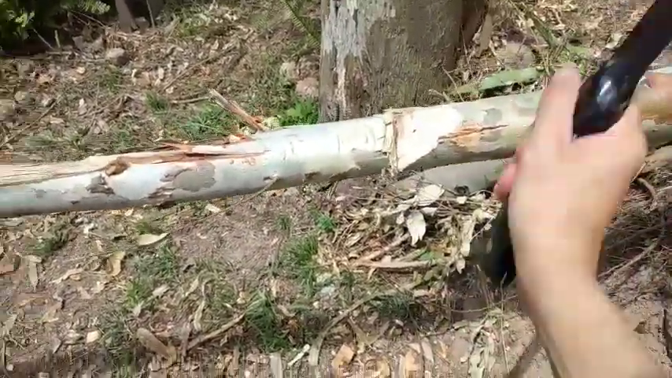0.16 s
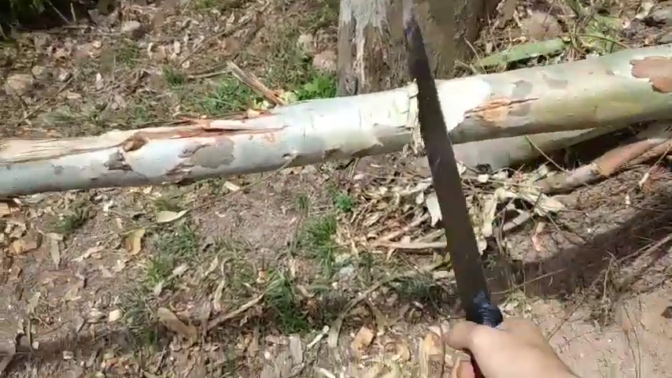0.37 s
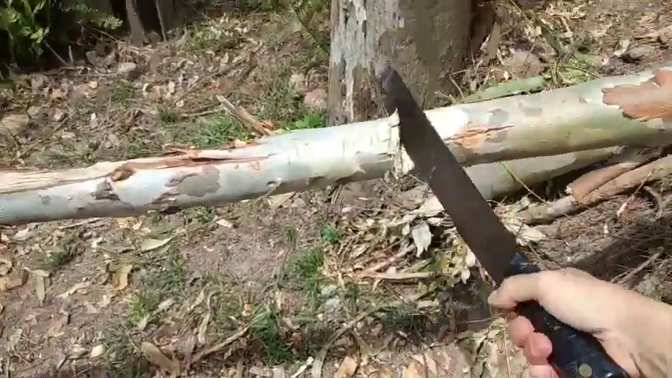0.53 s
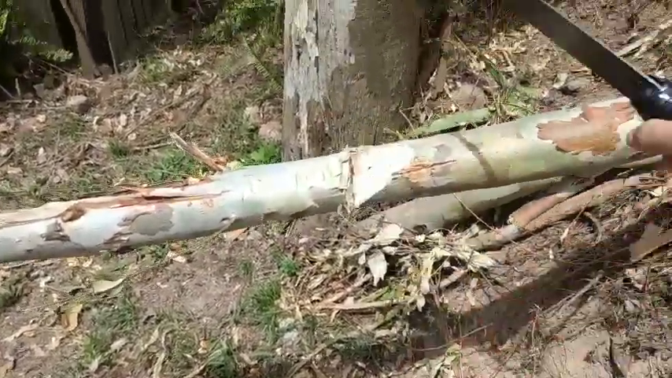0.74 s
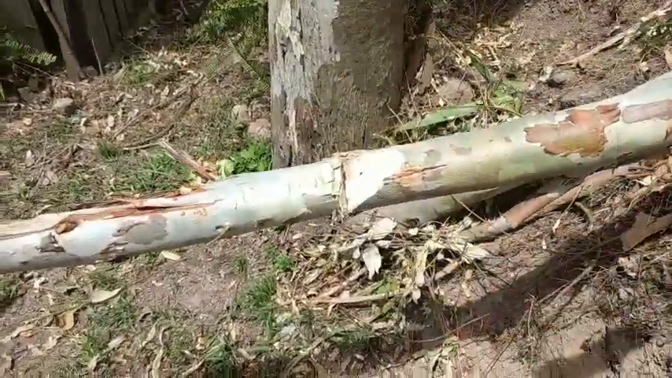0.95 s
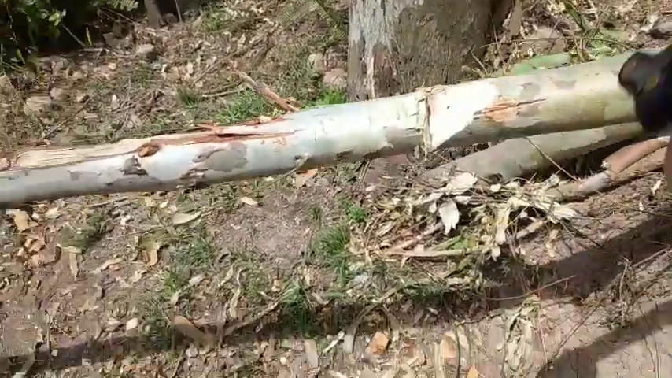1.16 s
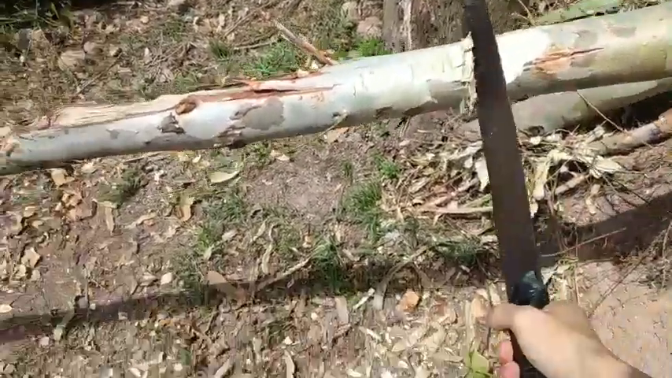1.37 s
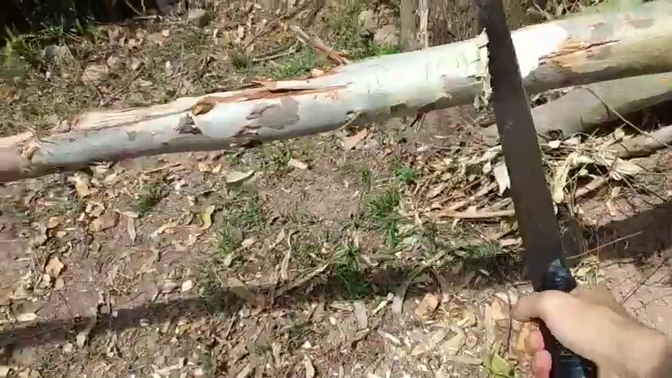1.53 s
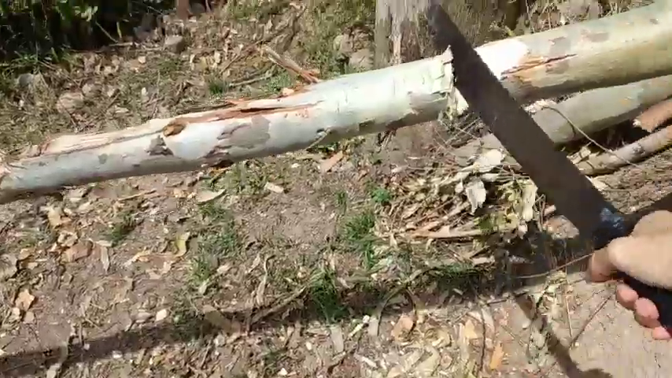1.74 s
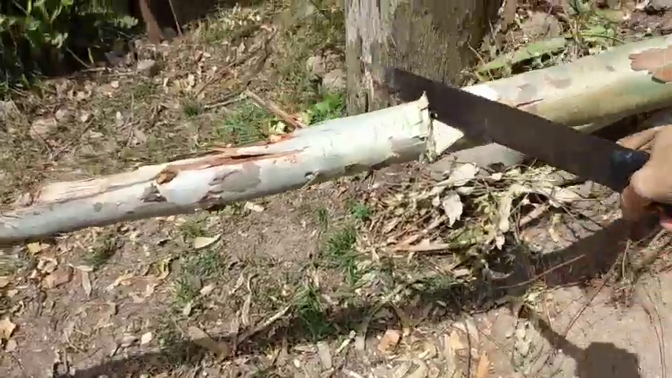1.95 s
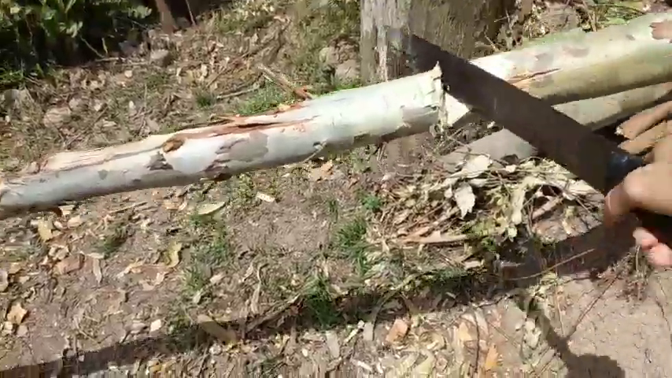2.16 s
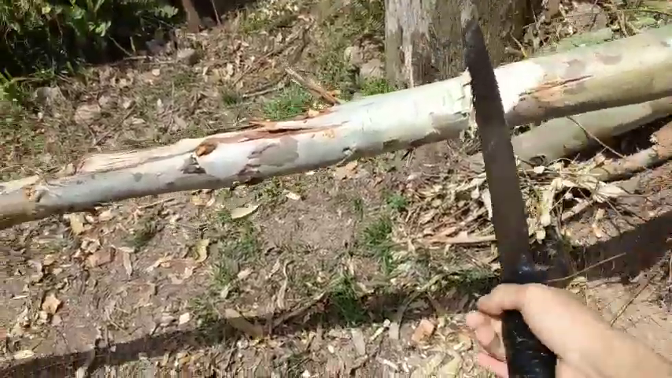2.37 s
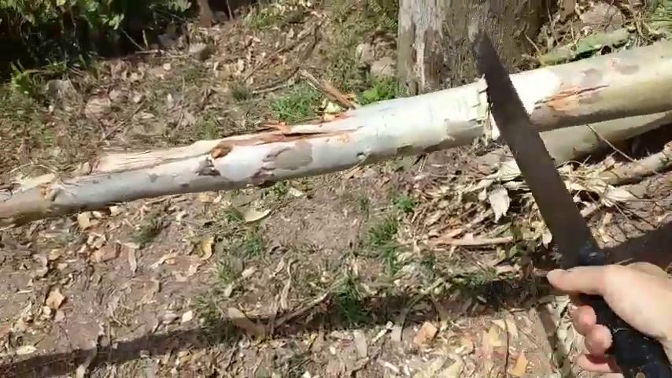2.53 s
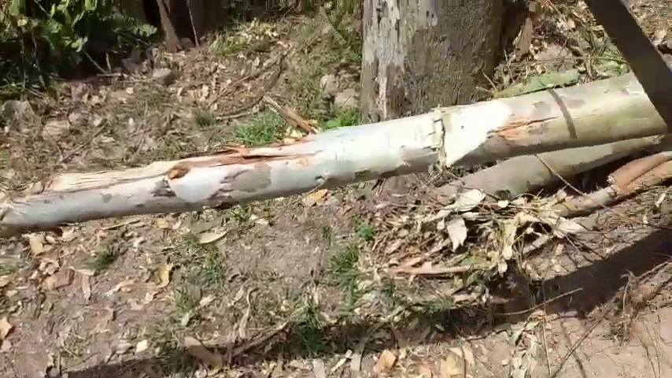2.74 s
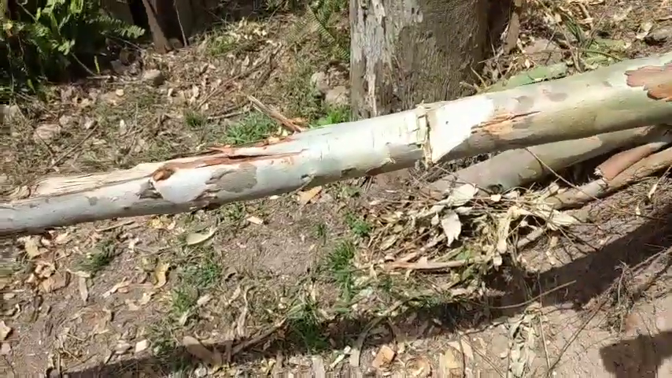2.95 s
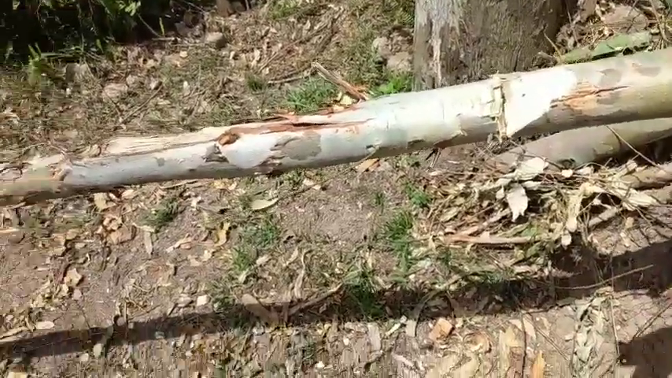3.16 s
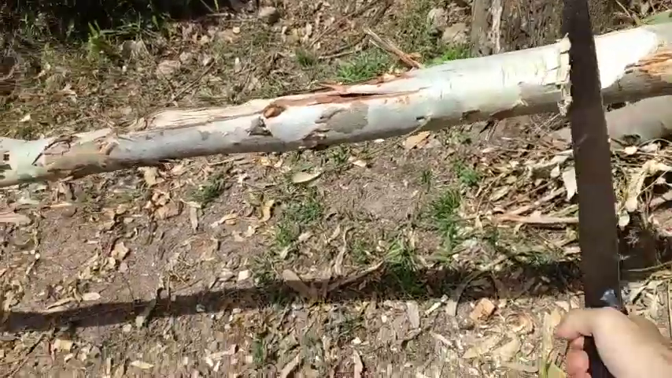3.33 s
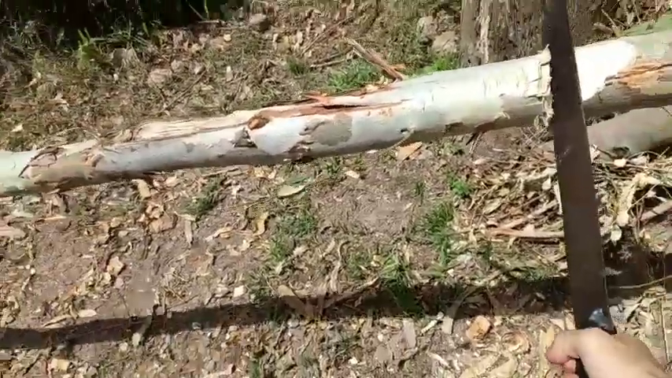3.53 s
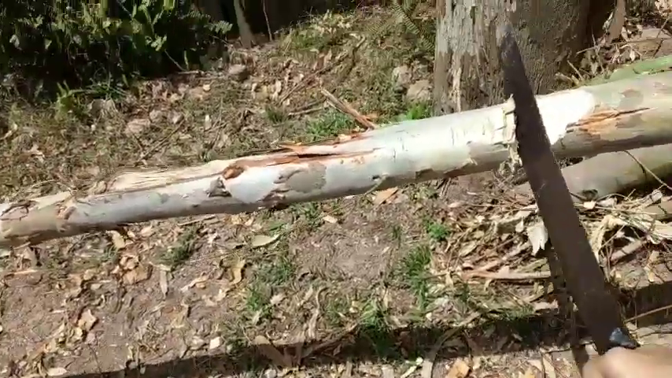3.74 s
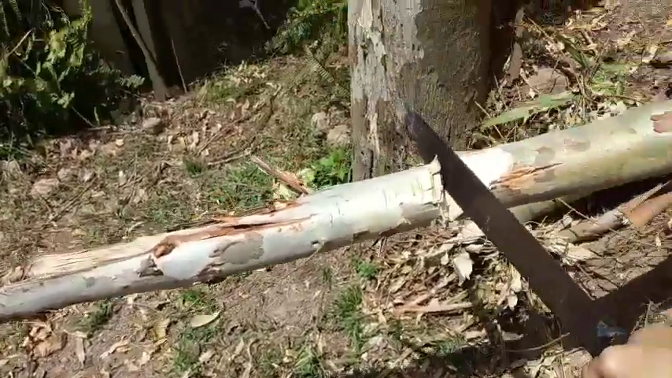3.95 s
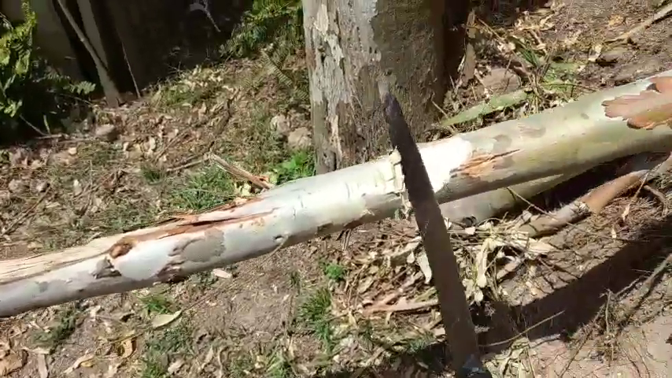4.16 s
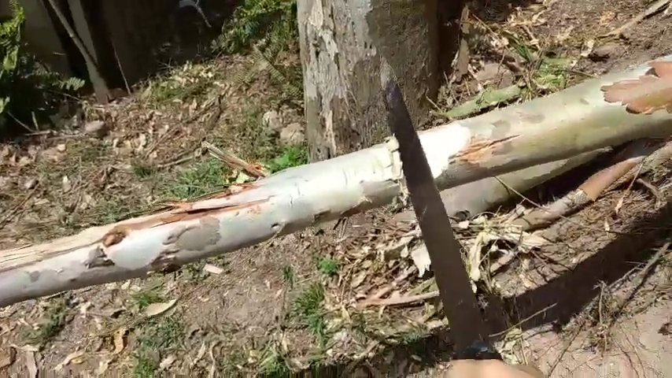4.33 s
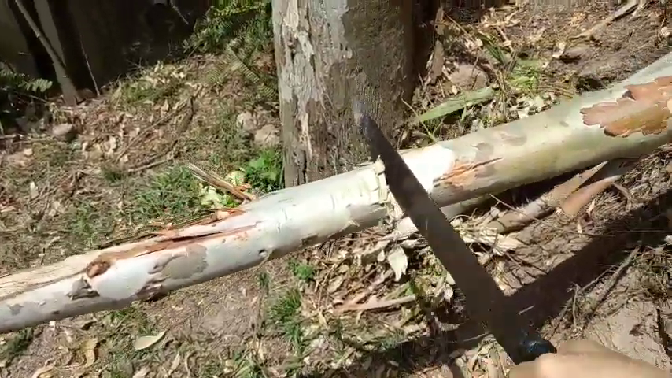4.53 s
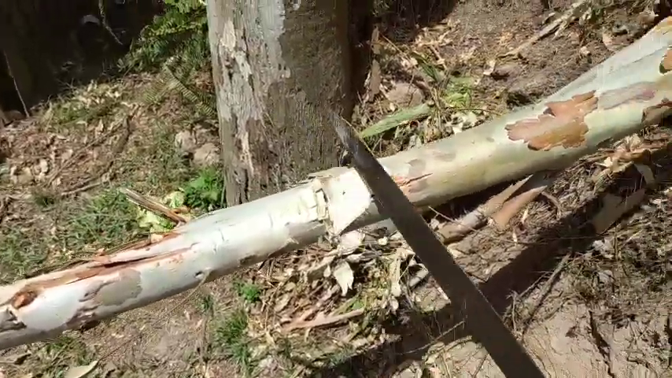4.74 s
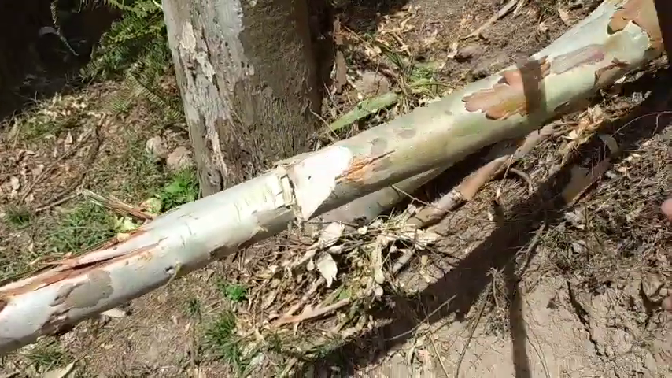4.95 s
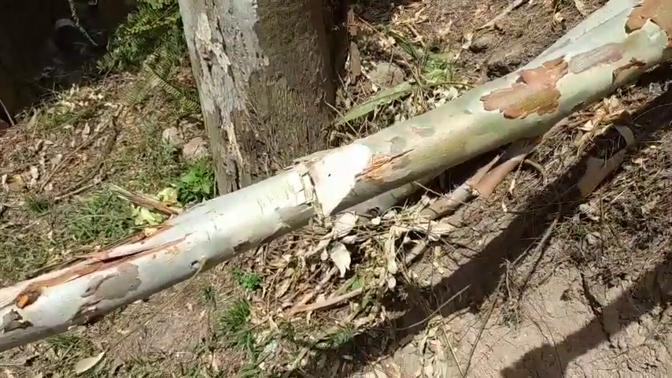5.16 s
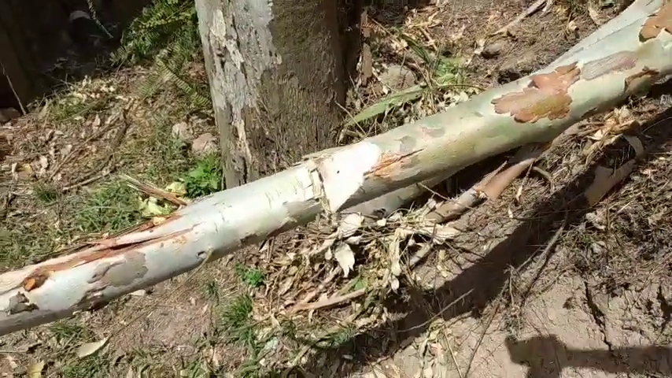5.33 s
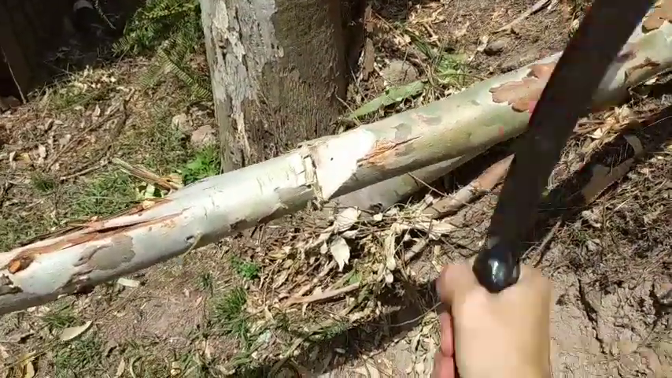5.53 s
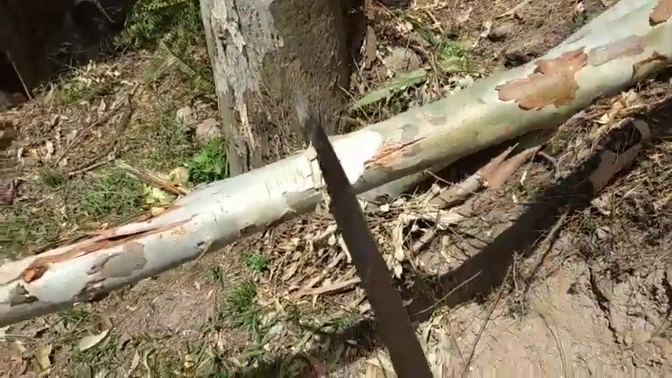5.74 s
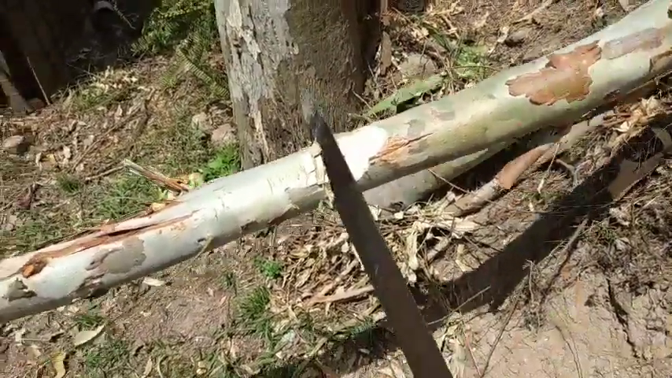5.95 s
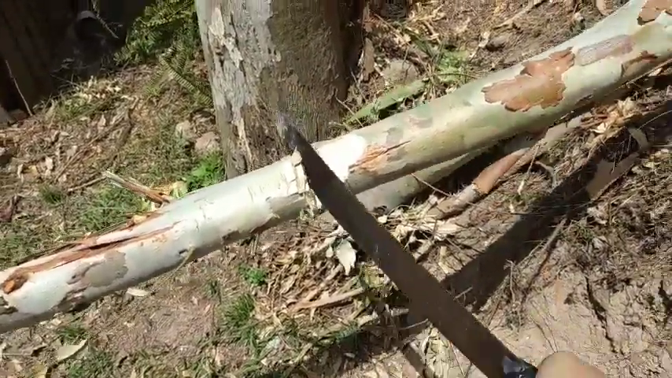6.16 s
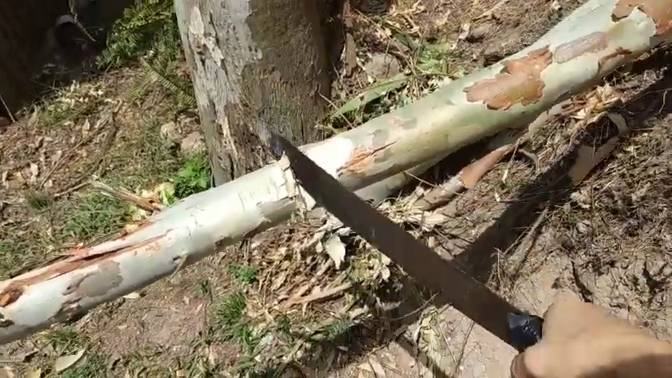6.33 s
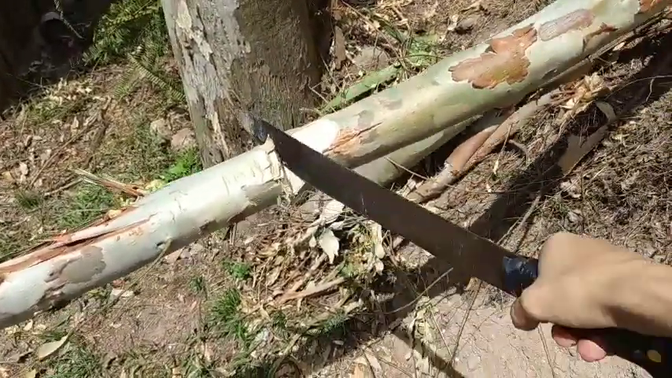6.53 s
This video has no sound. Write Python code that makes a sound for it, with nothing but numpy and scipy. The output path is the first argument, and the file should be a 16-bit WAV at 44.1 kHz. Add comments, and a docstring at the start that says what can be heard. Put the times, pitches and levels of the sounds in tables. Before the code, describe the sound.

Four sharp machete chops into a felled pole, each a woody crack with a short yard echo and falling chips, wind buffeting low between.

```python
"""A machete chops four times into a felled pole in a yard, an arm's length from the microphone.
Each bite is a burst of snapping-fibre noise and a thud, with decaying pole and blade modes, an echo
from the yard, a patter of chips and a slow surge from the overloaded microphone ports.
Between the blows the blade rubs in the cut as grainy bands of noise, wind buffets each port
as lumpy low noise, and a wavering sine hums far away over a murk of outdoor noise."""
import sys
import numpy as np
from scipy import signal
from scipy.fft import rfft, irfft, next_fast_len
from scipy.io import wavfile
from scipy.ndimage import uniform_filter1d, minimum_filter1d, map_coordinates

SR = 44100
rng = np.random.default_rng(int(sys.argv[2]) if len(sys.argv) > 2 else 0)


def to_wav(sig):
    """Store sig (one row per channel, or 1-D mono) as 16-bit WAV at the path in sys.argv[1].

    Samples outside -1..1 are clipped; the rate is SR.
    """
    pcm = np.clip(np.atleast_2d(sig), -1, 1) * 32767
    pcm = np.round(pcm).astype(np.int16)
    wavfile.write(sys.argv[1], SR, pcm.T)  # frames by channels


N = 295026
TIME = np.arange(N) / SR
AFTER = np.arange(SR // 2) / SR  # seconds after a blow

# The blows of the machete.
# Each row: start in seconds, time to full depth in seconds, crack level in dB, crack t60 in seconds,
# stopping thud over the crack in dB, pole ring in dB, blade ring in dB,
# frequency in Hz above which the treble of the crack is held back,
# body, knock, hollow and snap bands in dB, left over right in dB, length of the chip patter in seconds,
# left and right surge (linear), draught of the swing in dB, draught left over right in dB.
BLOWS = [(.363, .0024, -8, 0.025, 0, -15.5, -33.5, 2640, -3, 2.5, -7.5, 1, 1.4, 0.26, -0.088, 0.98, -33.5, -10),
         (1.3707, .0082, -6.5, 0.053, -8.5, -9.5, -18.5, 2678, 0.5, 0.5, 1, 0, 1.5, 0.2, -0.14, 0.53, -29.5, 16),
         (3.3992, .007, -7.5, .05, -5, -9, -38.5, 2928, 1, -2, -1.5, -7.5, -2.5, .22, -0.44, -0.19, -27.5, 12.5),
         (5.7184, .003, -10, 0.043, 0, -15, -35, 2910, 2, 1.5, 4.5, 2.5, 4, .2, 0, -0.53, -39, 12.5)]
# How alike left and right are in diffuse sound. Each row: frequency in Hz, correlation from -1 to 1.
LIKENESS = [(60, 0.9), (130, 0.71), (290, 0.97), (640, 0.23), (1410, -0.23), (3100, 0.23), (6800, 0.3)]


def chops(chips_db=-50, yard_db=-17):
    """Four blows and their debris, coloured differently by the two microphone ports."""
    # Body, knock, hollow and snap: wood bands whose strength depends on where the edge lands.
    # Each row: centre in Hz, width in octaves.
    wood_bands = [(490, .22), (730, .18), (1080, .06), (2650, .2)]
    # Colour of the two ports. Each row: frequency in Hz, left over right in dB.
    port_colour = [(300, 2.5), (700, 5), (1300, -2), (2300, -1.5), (4200, 1), (5500, 1), (7300, 14.5),
                   (10000, -2), (15000, -5.5)]
    blows, surges = np.zeros((2, N)), np.zeros((2, N))
    for (s, depth_s, crack_db, t60, stop_db, ring_db, blade_db, hold_hz, *bands_db,
         balance_db, patter_s, left, right, _, _) in BLOWS:
        direct = amp(crack_db) * crack(depth_s, t60, stop_db, hold_hz)
        direct = direct + amp(ring_db) * ring(depth_s) + amp(blade_db) * blade()
        place = lambda hz: amp(sum(db * bell(hz, *band) for db, band in zip(bands_db, wood_bands)))
        struck = sides(balance_db) * filtered(direct, place)
        echo = amp(crack_db + yard_db) * yard()
        debris = amp(chips_db) * chips(patter_s) + flakes()
        add(blows, s, struck + echo + debris)
        add(surges, s, np.outer([left, right], surge(depth_s)))
    return filtered(blows, lambda hz: sides(along(port_colour, hz))) + surges


def crack(depth_s, t60, stop_db, hold_hz, entry_db=-4, treble_db=-19, soft_db=-8, thin_hz=380, alike=0.16):
    """Fibres snap until the wood stops the edge with one hard thud; treble over hold_hz is held back."""
    # Colour of snapping fibres. Each row: frequency in Hz, density in dB per Hz.
    fibre_colour = [(60, -2), (200, 1), (330, -4.5), (480, 4.5), (780, 1.5), (1000, -3), (1500, -3.5),
                    (2100, -3), (2700, -3.5), (4500, -6), (8000, -8.5), (11000, -20.5), (15500, -20)]
    above = lambda hz: 1 - 1 / (1 + (hz / (1.003 * hold_hz)) ** 20)
    colour = lambda hz: amp(along(fibre_colour, hz) + treble_db * above(hz))
    sinking_db = entry_db * (1 - AFTER / depth_s)
    stopped_db = -60 * (AFTER - depth_s) / t60
    force = amp(np.where(AFTER < depth_s, sinking_db, stopped_db))
    snaps = unit(noise(len(AFTER), colour, lambda hz: alike) * force)
    snaps = snaps * np.sqrt(np.mean(force ** 2))
    radiated = lambda hz: hz ** 2 / (hz ** 2 + thin_hz ** 2)  # a thin pole radiates little bass
    click = impulse(lambda hz: colour(hz) * radiated(hz) * amp(soft_db * above(hz)))
    thud = click * amp(stop_db) * np.linalg.norm(force)
    add(snaps, depth_s - .0007, np.outer([0, 1], thud))  # the thud reaches the right port first
    add(snaps, depth_s - .0003, np.outer([1, 0], thud))
    return snaps


def ring(depth_s, t60_at_500=0.14, damping_slope=0.4, scatter_db=-2.0, detune=0.0042):
    """The pole's modes swell while the edge sinks in; each reaches the two ports at its own phase."""
    # Modes of the pole with the blade in it, before random scatter.
    # Each row: frequency in Hz, relative level in dB.
    pole_modes = [(408, -5), (495, -2.5), (578, -1), (678, 0.5), (760, -2), (838, -2.5), (985, -15),
                  (1112, -1), (1275, -9), (1366, 0), (1570, -7.5), (1812, -12), (1975, -11)]
    hz, db = np.transpose(pole_modes)[:, :, None]
    t60 = t60_at_500 * (hz / 500) ** -damping_slope  # higher modes die sooner
    size, shift, phase, apart = rng.standard_normal((4, len(pole_modes), 1))
    modes = amp(db + scatter_db * size - 60 * AFTER / t60)
    angle = 2 * np.pi * (hz * (1 + detune * shift) * AFTER + phase)
    pair = np.array([np.sum(modes * np.sin(angle + side * apart / 2), axis=0) for side in (1, -1)])
    rise = 1 - np.exp(-(AFTER / depth_s) ** 2)
    return pair * rise / np.linalg.norm(amp(db))


def blade(blade_hz=2345, t60=0.14, rise_s=0.0064):
    """The steel sings briefly, damped by the wood that grips it."""
    phase = rng.random() + np.array([[0], [1 / 10]])  # in cycles, left and right
    tone = np.sin(2 * np.pi * (blade_hz * AFTER + phase))
    return tone * amp(-60 * AFTER / t60) * (1 - np.exp(-AFTER / rise_s))


def yard(build_s=0.0097):
    """Trunks, fence and ground scatter the blow back: noise that builds, then decays band by band."""
    # Colour of the echo. Each row: frequency in Hz, relative level in dB.
    echo_colour = [(100, -20), (350, 2.5), (700, 4.5), (1100, -0.5), (2500, -6), (3200, -18.5), (8000, -24),
                   (15000, -40)]
    # Decay of the echo. Each row: frequency in Hz, t60 in seconds.
    echo_decay = [(200, 0.2), (800, 0.25), (2400, 0.28), (8000, 0.36)]
    echo = noise(len(AFTER), lambda hz: amp(along(echo_colour, hz)), lambda hz: along(LIKENESS, hz))
    hz, t, z = signal.stft(echo, SR, nperseg=256)
    decay = amp(-60 * t / along(echo_decay, hz)[:, None])
    tail = signal.istft(z * decay, SR, nperseg=256)[1][:, :len(AFTER)]
    return tail * (1 - np.exp(-AFTER / build_s))


def chips(patter_s, fade_db=13, shut_s=0.032):
    """The patter of chips fades, then this bright tail is shut off smoothly around patter_s."""
    shut = (1 - np.tanh((AFTER - patter_s) / shut_s)) / 2
    return patter(len(AFTER)) * amp(-fade_db * AFTER / patter_s) * shut


def flakes(count=3, first_db=-50.5, loss_db=7, width_s=.007):
    """A few bigger flakes land one after another as bursts of patter, the later ones softer."""
    flight_s, gap_s, scatter_s = .115, .06, 0.0092  # first landing, time between, chance in each
    out = np.zeros((2, len(AFTER)))
    shape = swell(width_s)
    for k, chance in enumerate(rng.standard_normal(count)):
        landing_s = flight_s + k * gap_s + chance * scatter_s
        flake = amp(first_db - k * loss_db) * shape * patter(len(shape))
        add(out, landing_s - len(shape) / SR / 2, flake)
    return out


def patter(n, bed=.65):
    """Tiny contacts of bark and dry leaves over steady noise, many faint and a few strong, rms 1."""
    # Colour of the contacts. Each row: frequency in Hz, relative level in dB.
    chip_colour = [(800, -11), (2400, -0.5), (3300, -11.5), (4500, -1), (5400, -7), (7400, 5), (9000, -7),
                   (12000, -15), (15500, -16.5)]
    chance, size = rng.random(n), np.minimum(rng.exponential(size=n), 3)
    ticks = (chance < 450 / SR) * amp(7 * size)  # about 450 contacts a second
    grains = unit(signal.fftconvolve(ticks, np.exp(-AFTER / .0011))[:n])
    return unit((bed + grains) * noise(n, lambda hz: amp(along(chip_colour, hz)), lambda hz: 0))


def surge(depth_s, delay_s=0.0012, rise_s=0.00098, push_s=.022, recover_s=0.049, undershoot=1.0):
    """An overloaded microphone is thrown off centre and swings slowly back past it."""
    t = np.maximum(AFTER - depth_s - delay_s, 0)
    push = (1 - np.exp(-t / rise_s)) * (1 + t / push_s) * np.exp(-t / push_s)
    return push - undershoot * (t / recover_s) ** 2 * np.exp(-1.2 * t / recover_s)


def rubs(rough_db=6.5, dull_hz=2700):
    """The blade slips in short, grainy rubs of band noise as it is levered out."""
    # The blade rubbing in the cut. Each row: time of the peak in seconds, bell width (sigma) in seconds,
    # level in dB, centre in Hz, width in octaves, hiss level in dB.
    slip_rows = [(2.237, 0.0032, -54, 2150, .27, -71), (3.905, 0.0057, -46.5, 1700, 0.8, -71),
                 (3.966, .0088, -51, 730, 0.63, -99), (3.982, 0.0027, -42, 977, 0.49, -92),
                 (4.304, 0.0031, -43, 1294, .9, -70.5), (4.325, .009, -39.5, 990, 0.6, -75.5),
                 (4.705, 0.023, -58.5, 2220, 0.77, -65)]
    out = np.zeros((2, N))
    for s, width_s, db, centre_hz, octaves, hiss_db in slip_rows:
        shape = swell(width_s)
        n = len(shape)
        wood = lambda hz: bell(hz, centre_hz, octaves) / (1 + (hz / dull_hz) ** 20)
        rough = unit(filtered(rng.standard_normal(n), lambda hz: np.exp(-hz / 200)))
        slips = unit(amp(rough_db * rough))
        rub = amp(db) * slips * noise(n, wood, lambda hz: .4)
        hiss = amp(hiss_db) * patter(n, bed=2.3)
        add(out, s - 3 * width_s, (rub + hiss) * shape)
    return out


def wind(buffet_db=-1, flutter_db=-9, strong_db=-21, brightening=0.6, lumps_db=6.0, flutter_lumps_db=4.5):
    """Each port is buffeted almost on its own, in lumps; stronger flow brings more fast flutter."""
    # Colour of the slow buffeting. Each row: frequency in Hz, relative level in dB.
    buffet_colour = [(12, -2.5), (28, 3), (70, 0), (130, -11.5), (220, -27), (400, -42), (900, -79),
                     (3000, -120)]
    # Colour of the faster flutter. Each row: frequency in Hz, relative level in dB.
    flutter_colour = [(40, -14), (110, 4), (200, -2), (300, -13), (500, -34.5), (1000, -46), (2500, -80),
                      (4000, -120)]
    # The strongest eddies, each a separate bump on the ports.
    # Each row: time in seconds, level in dB, rate in Hz, left over right in dB.
    eddies = [(.314, -21.5, 95, -17.5), (.927, -19.5, 126, -19), (1.322, -21.5, 107, 27.5),
              (1.635, -22.5, 83, -15.5), (2.166, -23.5, 140, -1), (3.058, -20, 130, -9.5),
              (3.127, -31, 260, 7), (3.237, -26, 120, 26), (3.382, -19, 80, 21.5)]
    flow, flutter = airflow()
    low = amp(buffet_db) * flow * noise(N, lambda hz: amp(along(buffet_colour, hz)), lambda hz: .1)
    fast_flow = amp(flutter_db) * flutter * (flutter / amp(strong_db)) ** brightening
    fast = fast_flow * noise(N, lambda hz: amp(along(flutter_colour, hz)), lambda hz: .1)
    out = lumps(lumps_db) * (low + lumps(flutter_lumps_db) * fast)
    for s, db, hz, balance_db in eddies:
        u = 2 * np.pi * hz * (TIME - s)
        out += amp(db) * sides(balance_db) * 2 * u / (1 + u * u / 2) ** 2  # suction, then pressure
    return out


def airflow(breeze_balance_db=5.5, gust_balance_db=-15.5, swing_s=0.14):
    """Flow at each port, for buffeting and flutter: breeze, gusts and swing draughts add in power."""
    # Light breeze that drops after the third blow. Each row: time in seconds, level in dB.
    breeze = [(0, -36.5), (1.2, -36), (3.45, -33.5), (3.85, -49.5), (5.3, -49), (6, -51.5), (6.69, -40)]
    # Gusts on top of the breeze, mostly at the right port.
    # Each row: start in seconds, length in seconds, level in dB, flutter flow over buffeting flow in dB.
    gust_rows = [(0.908, 0.25, -28.5, -1.5), (1.476, .17, -31, -2.5), (1.872, 0.31, -24.5, 1),
                 (2.278, 0.1, -29.5, -5.5), (2.577, 0.35, -27.5, 1), (2.955, .16, -25, -0.5),
                 (3.649, .12, -33.5, 1), (6.462, 0.11, -38.5, -5)]
    flows = [amp(np.interp(TIME, *np.transpose(breeze))) * sides(breeze_balance_db)]
    for s, *_, db, balance_db in BLOWS:  # the downswing pushes air at the ports before each blow
        flows.append(amp(db) * sides(balance_db) * gust(s - swing_s, swing_s))
    gusts = [amp(db) * sides(gust_balance_db) * gust(s, length_s) for s, length_s, db, _ in gust_rows]
    flutters = [amp(over_db) * push for (*_, over_db), push in zip(gust_rows, gusts)]
    return np.linalg.norm(flows + gusts, axis=0), np.linalg.norm(flows + flutters, axis=0)


def gust(start_s, length_s, attack_s=.025, release_s=.026):
    """A push of air: attack, hold, release."""
    early = np.maximum(start_s - TIME, 0)
    late = np.maximum(TIME - start_s - length_s, 0)
    return np.exp(-(early / attack_s) ** 2 - (late / release_s) ** 2)


def lumps(depth_db, per_s=30, even_s=.2):
    """Turbulence: quick swells and gaps at each port that leave the strength of a gust as it is."""
    gain = amp(depth_db * np.tanh([wobble(per_s), wobble(per_s)]))
    return gain / np.sqrt(uniform_filter1d(gain ** 2, int(even_s * SR)))


def background(air_db=-50, hum_hz=279):
    """Distant outdoor murk as coloured noise, and a hum as a sine unsteady in pitch and level."""
    # Colour of the murk. Each row: frequency in Hz, relative level in dB.
    air_colour = [(15, -10), (28, 2), (55, -3.5), (120, -10), (260, -13), (480, -17), (1200, -22),
                  (2100, -28), (2550, -34), (3150, -54), (4200, -63), (15000, -69)]
    # Course of the hum, before its wavering. Each row: time in seconds, level in dB.
    hum_level = [(0, -67), (3.8, -65.5), (4.6, -57.5), (6.2, -66.5), (6.69, -58.5)]
    air = noise(N, lambda hz: amp(along(air_colour, hz)), lambda hz: along(LIKENESS, hz))
    air = air * amp(air_db + 0.1 * wobble(3.3))
    cycles = np.cumsum(hum_hz + 4 * wobble(18)) / SR
    hum = np.sqrt(2) * np.sin(2 * np.pi * cycles) * amp(2 * wobble(9))
    return air + hum * amp(np.interp(TIME, *np.transpose(hum_level)))


def amp(db):
    """Decibels to gain."""
    return 10 ** (np.asarray(db) / 20)


def unit(x):
    """Scale to rms 1."""
    return x / np.sqrt(np.mean(x ** 2) + 1e-20)


def along(points, hz):
    """Interpolate (Hz, value) points on a log frequency axis."""
    f, v = np.transpose(points)
    return np.interp(np.log(hz + 1), np.log(f + 1), v)


def bell(hz, centre_hz, octaves):
    """A smooth band of height 1 on a log frequency axis."""
    return np.exp(-(np.log2((hz + 1) / centre_hz) / octaves) ** 2 / 2)


def sides(balance_db):
    """Left and right gains of mean power 1."""
    g = amp(np.array([np.atleast_1d(balance_db), -np.atleast_1d(balance_db)]) / 2)
    return g / np.sqrt(np.mean(g ** 2, axis=0))


def wobble(rate):
    """A smooth random curve, rate knots a second."""
    return map_coordinates(rng.standard_normal(int(N * rate / SR) + 4), [TIME * rate])


def swell(width_s):
    """A bell-shaped envelope that peaks three widths (sigma) after its start."""
    return np.exp(-np.linspace(-3, 3, int(6 * width_s * SR)) ** 2 / 2)


def filtered(x, response):
    """Filter x by a response of frequency."""
    n = x.shape[-1]
    m = next_fast_len(n + 8192)  # padding keeps the end from wrapping onto the start
    return irfft(rfft(x, m) * response(np.fft.rfftfreq(m, 1 / SR)), m)[..., :n]


def noise(n, gain, alike):
    """Stereo noise of rms 1 with a given colour and left-right likeness, mixed from mid and side."""
    turn = lambda hz: np.arccos(np.clip(alike(hz), -1, 1)) / 2 * np.ones_like(hz)
    shares = lambda hz: gain(hz) * np.array([np.cos(turn(hz)), np.sin(turn(hz))])
    mid, side = filtered(rng.standard_normal((2, n)), shares)
    return unit(np.array([mid + side, mid - side]))


def impulse(colour, size=4096):
    """The causal (minimum-phase) click of energy 1 that has a given colour."""
    cepstrum = irfft(np.log(colour(np.fft.rfftfreq(size, 1 / SR)) + 1e-6))
    cepstrum[1:size // 2] *= 2
    cepstrum[size // 2 + 1:] = 0
    click = irfft(np.exp(rfft(cepstrum)))
    return click / np.linalg.norm(click)


def add(track, s, sound):
    """Mix a sound in at time s."""
    part = track[:, max(round(s * SR), 0):][:, :sound.shape[1]]
    part += sound[:, :part.shape[1]]


def scene():
    """Blows, blade, wind and yard together."""
    return chops() + rubs() + wind() + background()


def record(dry, dull_hz=14000, top_hz=15850):
    """A fast limiter holds peaks at full scale; the top treble rolls off up to the band limit."""
    needed = 1 / np.maximum(np.abs(dry), 1)
    held = dry * uniform_filter1d(minimum_filter1d(needed, size=17), size=17)
    return filtered(held, lambda hz: (hz < top_hz) / np.sqrt(1 + (hz / dull_hz) ** 8))


dry = scene()
out = record(dry)
to_wav(out)
```